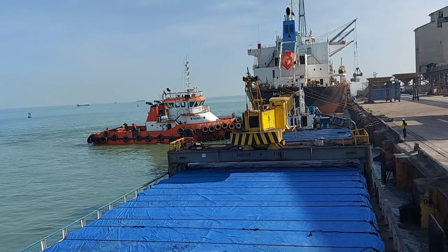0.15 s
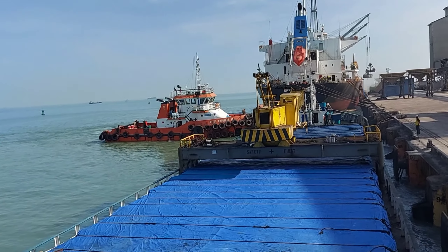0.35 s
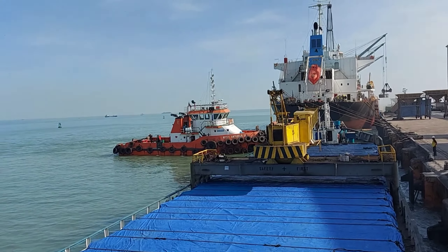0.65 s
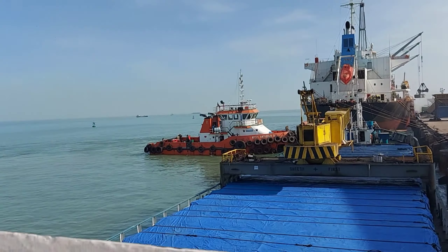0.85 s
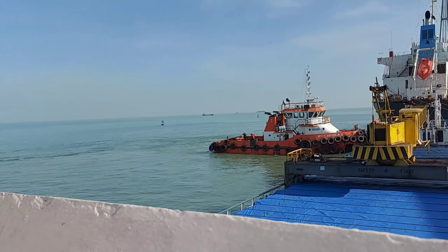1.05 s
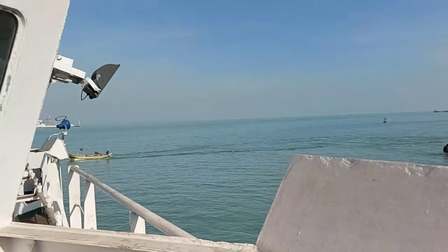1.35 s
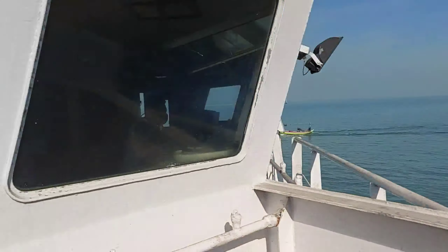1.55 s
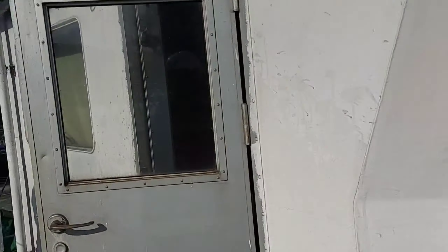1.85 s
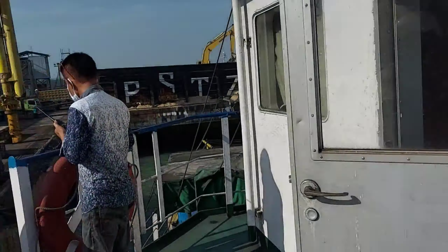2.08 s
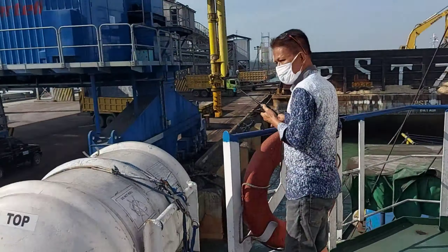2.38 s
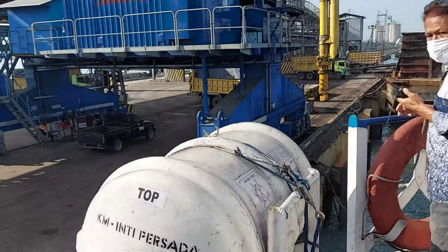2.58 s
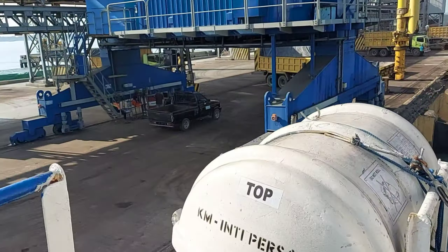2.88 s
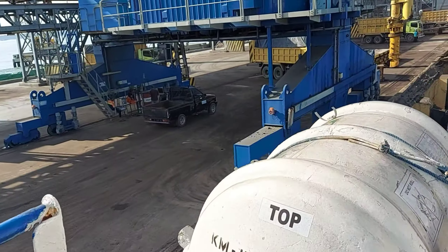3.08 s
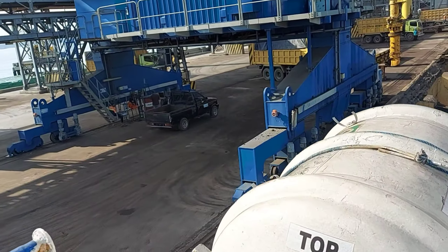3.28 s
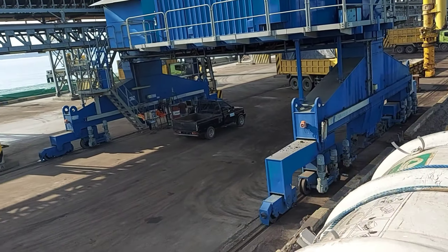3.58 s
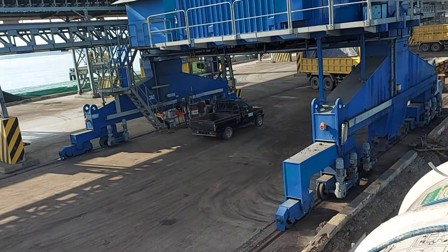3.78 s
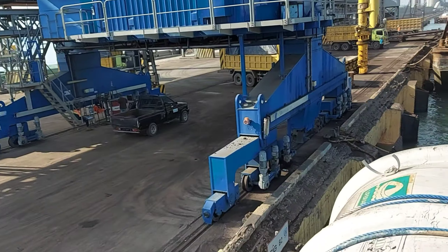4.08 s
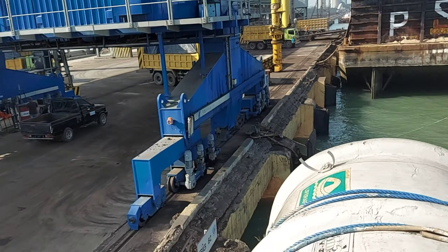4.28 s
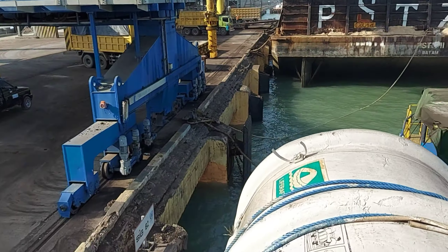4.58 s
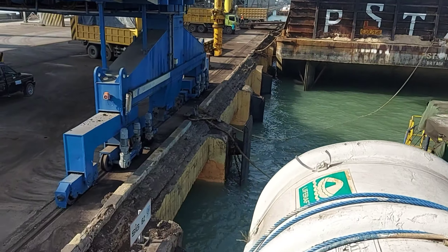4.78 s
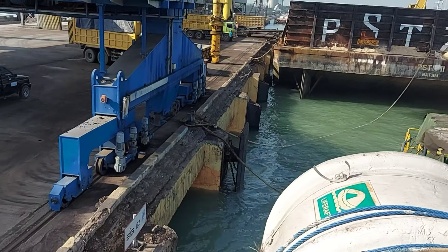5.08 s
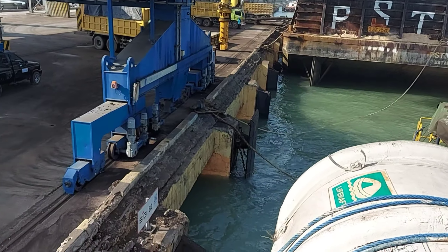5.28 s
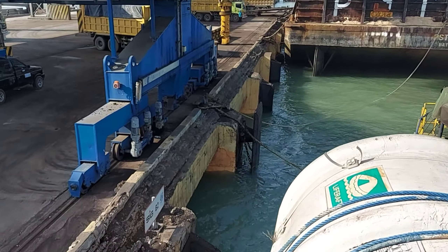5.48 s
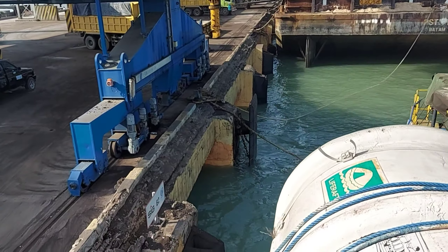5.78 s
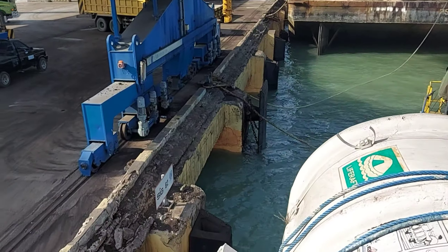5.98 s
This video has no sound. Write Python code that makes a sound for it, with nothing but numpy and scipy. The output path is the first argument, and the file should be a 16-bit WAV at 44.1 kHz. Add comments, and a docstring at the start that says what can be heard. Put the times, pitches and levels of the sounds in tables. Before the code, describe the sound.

A continuous low diesel drone, roughly 55 to 190 hertz, fills the deck, wavering slightly, with a broad, dull roar of machinery and fans all round. From the start a one-cylinder boat engine knocks at about twelve puffs a second, dry, clacking and hissy, on the left. Tiny bird-like chirps flick by at 0.2, 0.6 and 1.35 s; soft low bumps cluster around 1.0 s. From 1.2 to 1.8 s the handheld stereo microphone swings round: the knocks cross to the right, dull and die by 2.05 s. Scuffs and small ticks follow at 2.1-2.6 s, with faint reflected knocks around 2.9-3.1 s. A second engine's very low note glides down, then slowly up. A hollow hum softens, a patchy watery wash grows after 3.3 s, and a duct-like howl near 320 hertz enters around 4 s. Slight ticks, dull swells, faint chirps and a thin whistle close at 6.1 s.

```python
"""The main diesel of a ship drones in sines at multiples and fractions of the shaft rate, beside a jetty.
A second engine hunts in speed as one gliding tone; banded noise makes the roar of machinery and fans all round.
A one-cylinder boat engine knocks across the water: noise puffs ringing through resonances. The two-port
microphone is swung round, so the boat moves from left to right and fades behind the wheelhouse.
Narrow hums, a howl, a whistle, dull swells, a patchy wash, small ticks and gliding chirps fill the rest."""
import sys
import numpy as np
from scipy import signal
from scipy.fft import rfft, irfft, next_fast_len
from scipy.io import wavfile

SR = 44100
rng = np.random.default_rng(int(sys.argv[2]) if len(sys.argv) > 2 else 0)


def master_out(mix):
    """Clip the mix to full scale and print it as 16-bit PCM to the path in sys.argv[1]."""
    frames = np.transpose(np.atleast_2d(mix))
    ceiling = np.clip(frames, -1, 1)
    pcm = np.round(ceiling * 32767).astype(np.int16)
    wavfile.write(sys.argv[1], SR, pcm)


N = 270774
T = np.arange(N) / SR   # time [s]
SWING_MIDDLE_S, SWING_S, SWING_REACH = 1.52, 0.26, 1.06   # the turn that carries the boat from left to right
PORT_LAG_MS = 0.464   # delay to the far port for a sound from the side


def amp(db):
    """Decibels to linear gain."""
    return 10 ** (np.asarray(db) / 20)


def rms_one(x):
    """Scale to an rms of 1."""
    return x / np.sqrt(np.mean(x ** 2) + 1e-20)


def in_time(rows):
    """Columns of a time table joined by straight lines, one value a sample."""
    s, *columns = np.transpose(rows)
    return [np.interp(T, s, c) for c in columns]


def at_hz(points, hz):
    """All columns of a spectrum table at the given frequency, joined along log frequency."""
    f, *columns = np.transpose(points)
    return [np.interp(np.log(hz), np.log(f), c) for c in columns]


def drift(rate_hz):
    """Slow chance with spread 1: low-passed noise made at every 40th sample, then joined by lines."""
    r = np.exp(-80 * np.pi * rate_hz / SR)
    noise = rng.standard_normal(N // 40 + 2002)
    slow = signal.lfilter([1], [1, -2 * r, r * r], noise)[2000:]   # skip the filter's start
    return np.interp(np.arange(N) / 40, np.arange(len(slow)), rms_one(slow - slow.mean()))


def resonance(x, hz, width_hz):
    """Two-pole peak with gain about 1 on top."""
    r = np.exp(-np.pi * width_hz / SR)
    poles = [1, -2 * r * np.cos(2 * np.pi * hz / SR), r * r]
    return signal.lfilter([(1 - r * r) / 2, 0, (r * r - 1) / 2], poles, x)


def tone(hz, level_db):
    """A sine of given rms level on a pitch curve, starting at a random phase."""
    cycles = np.cumsum(hz + 0 * T) / SR + rng.random()
    return np.sqrt(2) * amp(level_db) * np.sin(2 * np.pi * cycles)


def main_engine():
    """Orders with level curves, and wavering minor orders that change as the microphone turns."""
    shaft_hz = 9.42
    # three firing orders and two weaker ones among them, as multiples of the shaft rate [orders]
    traced_orders = [6, 12, 14.1, 18, 20.11]
    # wavering levels of these orders: (time [s], level of each order [dB] in five columns)
    order_levels = [(0, -19.5, -46, -32, -27, -29.5), (.45, -21.5, -42, -30.5, -36.5, -34.5),
                    (.9, -20.5, -46, -35, -34, -35), (1.3, -23, -38, -35, -30.5, -39),
                    (1.65, -19.5, -34.5, -37, -34.5, -40), (2.3, -21.5, -28.5, -48, -33.5, -46),
                    (2.95, -25, -25.5, -46, -30.5, -35), (3.4, -33, -24, -48, -32, -50),
                    (3.8, -44, -27.5, -48, -29, -46), (4.35, -34, -28.5, -40, -28, -43),
                    (4.85, -27, -28.5, -40, -30.5, -51), (5.1, -40, -30.5, -46, -46, -43),
                    (5.55, -36, -28, -33, -31, -48), (5.85, -40, -28, -44, -35, -48),
                    (6.14, -46, -50, -44, -44, -44)]
    # minor orders left by uneven cylinders: (order, level facing the bow [dB], level after the turn [dB])
    minor_orders = [(7.54, -35, -33), (9.06, -45, -39.5), (11.07, -43, -37), (14.98, -43, -67),
                    (15.76, -48, -56), (17.18, -42.5, -50), (19.25, -34.5, -49), (21.94, -52, -45),
                    (24.06, -49, -46.5)]
    out = np.zeros(N)
    for order, level_db in zip(traced_orders, in_time(order_levels)):
        out += tone(order * shaft_hz, level_db)
    turned = (1 + np.tanh((T - SWING_MIDDLE_S) / SWING_S)) / 2   # 0 before the turn, 1 after
    for order, bow_db, turned_db in minor_orders:
        level_db = bow_db + (turned_db - bow_db) * turned
        out += tone(order * shaft_hz, level_db + 3.56 * drift(0.85))
    return out


def second_engine():
    """One gliding firing note that comes in as the microphone clears the wheelhouse."""
    # hunting speed: (time [s], firing note [Hz], level [dB])
    hunting = [(2.05, 43.86, -46), (2.2, 43.7, -29), (2.4, 46, -29), (2.65, 41.7, -24.5), (2.95, 36.9, -36),
               (3.2, 39.94, -31), (3.6, 41.4, -24.5), (4.5, 41.5, -22.5), (5, 42.2, -24), (5.3, 44.1, -31),
               (5.45, 45.7, -24), (5.75, 45.3, -31), (5.9, 48.2, -22), (6.13, 51, -43)]
    return tone(*in_time(hunting)) * np.clip(T - 1, 0, 1)


def roar(patchy_db, lumpy_db):
    """Third-octave noise bands arriving from ahead, from either side and from all round."""
    # centres of rumble, body, middle, edge and treble [Hz]
    centres_hz = [130, 350, 750, 3000, 11000]
    # overall spectrum: (frequency [Hz], relative density [dB per Hz])
    colour = [(26, -14), (60, -7.5), (113, -4.5), (182, -8), (225, -13.5), (301, -5), (560, -19.5),
              (681, -20.5), (1430, -33.5), (2230, -32.5), (3410, -37), (4500, -38.5), (8350, -46.5),
              (11800, -46), (15500, -53.5)]
    # directions against the diffuse part: (frequency [Hz], ahead [dB], left [dB], right [dB])
    arrivals = [(35, 32, -3, 18), (70, 4, -12, -4), (199, 8, 7.5, 6), (438, 8, 7, 3.5), (860, -13, -8, -3),
                (1800, -29, -3, -10), (4150, -13, -8, -8.5), (12000, -30, -47, -37)]
    # level curves whose changes move the five regions: (time [s], level [dB])
    rumble = [(0, 6.5), (.5, 1.5), (1.0, 4.5), (1.6, -3.5), (2.3, 0.5), (3.0, 1), (4, 1), (5.1, -3),
              (5.5, 3), (5.8, 4), (6.14, 7)]
    body = [(0, 1), (.8, 1.5), (1.6, 3.5), (2.6, 3.5), (3.6, 3.5), (4.5, 4), (5.3, 5.5), (6.14, 5.5)]
    middle = [(0.05, -39.5), (0.95, -40.5), (1.25, -42.5), (1.8, -43.5), (2.2, -42.5), (2.8, -41),
              (3.5, -43), (4.43, -43), (5.22, -42), (5.61, -39), (6.1, -38)]
    edge = [(0.05, -49), (0.5, -44.5), (1.0, -47.5), (1.4, -49.5), (2.3, -49.5), (3.0, -48.5), (3.7, -49),
            (4.5, -48.5), (5.3, -48), (5.7, -47.5), (6.1, -45)]
    treble = [(0.05, -55.5), (0.5, -49.5), (0.96, -51.5), (1.46, -56.5), (2.36, -54.5), (2.58, -55.5),
              (4.82, -53.5), (5.27, -54.5), (6.1, -50.5)]
    curves = [in_time(rows)[0] for rows in (rumble, body, middle, edge, treble)]
    levels = np.array(curves)[:, ::64]
    steady = levels[:, levels.shape[1] // 2:].mean(axis=1)   # swells are relative to the second half
    moves = levels - steady[:, None]

    lag = round(PORT_LAG_MS * SR / 1000)
    edges_hz = 26 * 2 ** (np.arange(29) / 3)
    white = rng.standard_normal((2, 5, N))   # neighbouring bands take turns with two sets of noise
    together, out = drift(2.1), 0
    for k, (low, high) in enumerate(zip(edges_hz, edges_hz[1:])):
        hz = np.sqrt(low * high)
        ahead, left, right, own_l, own_r = white[k % 2]
        a, l, r = amp(at_hz(arrivals, hz))
        # a sound from the side reaches the far port late
        port_l = a * ahead + l * left + r * np.roll(right, lag) + own_l
        port_r = a * ahead + l * np.roll(left, lag) + r * right + own_r
        pair = np.array([port_l, port_r]) / np.sqrt(a * a + l * l + r * r + 1)

        # blend the two nearest level curves
        place = np.interp(np.log(hz), np.log(centres_hz), np.arange(len(levels)))
        i = min(int(place), len(levels) - 2)
        swell = (i + 1 - place) * moves[i] + (place - i) * moves[i + 1]
        patches = 0.2 * together + drift(18.0) + 0.55 * drift(2.3)
        lumps = (hz < 200) * drift(4.5)   # the rumble comes in slow lumps
        gain_db = at_hz(colour, hz)[0] + np.interp(T, T[::64], swell)
        gain_db = gain_db + patchy_db * patches + lumpy_db * lumps
        band = signal.butter(2, [low, high], "band", fs=SR, output="sos")
        out = out + amp(gain_db) * signal.sosfilt(band, pair)
    return rms_one(out)


def puff(length, rise_s, fall_s):
    """A gas puff: noise under an envelope that swells fast to 1 and dies; length in samples."""
    t = np.arange(length) / SR
    shape = (1 - np.exp(-(t / rise_s) ** 2)) * np.exp(-t / fall_s)
    return shape / shape.max() * rng.standard_normal(length)


def even_start(x):
    """Scale so that the first 10 ms have spread 1."""
    return x / x[:SR // 100].std()


def boat_bearing():
    """Direction of the boat: -1 left, 1 right, with a slight overshoot of both."""
    return SWING_REACH * np.tanh((T - SWING_MIDDLE_S) / SWING_S)


def exhaust_blow(size, blow, scatter, echo_db, crack_db):
    """A puff, its scatter off hulls, and a one-sample crack in the blow; puffs are (rise [s], fall [s])."""
    crack_s = .0045
    gas = puff(size, *blow) + amp(echo_db) * puff(size, *scatter)
    gas[round(crack_s * SR)] += amp(crack_db)
    return gas


def knock_mid(gas, peak_hz):
    """The moving mid peak of the knock, coloured by the delay between the ports, and two fixed resonances."""
    ring = resonance(gas, peak_hz, 340) - 0.52 * resonance(gas, 1150, 300) + 0.25 * resonance(gas, 1950, 180)
    return resonance(ring, peak_hz, 3600)   # little passes far from the peak


def knock_clack(gas, clack_hz, early):
    """Bright resonances struck with other strengths by each blow."""
    scatter_db = 4.5
    # (centre [Hz], width [Hz], level early in the turn and before [dB], level later [dB])
    clack_peaks = [(2500, 1500, -11, -7), (2780, 230, -4, -12), (3650, 270, 5, 0), (3850, 310, -2, -7),
                   (4800, 240, -4, -9), (5500, 270, -8, -11), (4800, 2300, -16, -16)]
    out = resonance(gas, clack_hz, 400)
    for hz, width_hz, early_db, later_db in clack_peaks:
        level_db = (early_db if early else later_db) + scatter_db * rng.standard_normal()
        out = out + amp(level_db) * resonance(gas, hz, width_hz)
    return resonance(out, clack_hz, 5100)


def knock_spit(gas):
    """The hissing top of the blow, from wide high resonances."""
    # (centre [Hz], width [Hz], level [dB])
    spit_peaks = [(6300, 1500, -3), (7460, 1000, 13.5), (9630, 3200, 7), (11500, 2000, -1),
                  (14000, 3500, -5)]
    return sum(amp(db) * resonance(gas, hz, width_hz) for hz, width_hz, db in spit_peaks)


def valve_tick(size, knock_s, lead_s):
    """A short ringing tick, then a brighter seating click, lost behind the wheelhouse."""
    valve_hz, valve_width_hz, valve_db, scatter_db = 2580, 120, -47, 2.5
    seat_hz, seat_width_hz, seat_db, seat_lead_s = 3900, 1300, -4, .0135   # level against the tick
    fade_from_s, fade_db_per_s = 1.55, 33
    tick = resonance(puff(size, 0.001, 0.0033), valve_hz, valve_width_hz)
    tick = even_start(resonance(tick, valve_hz, 400))
    seat = even_start(resonance(puff(size, 0.00048, 0.001), seat_hz, seat_width_hz))
    seat = np.roll(amp(seat_db) * seat, round((lead_s - seat_lead_s) * SR))
    level_db = valve_db + scatter_db * rng.standard_normal() - fade_db_per_s * max(knock_s - fade_from_s, 0)
    return amp(level_db) * (tick + seat)


def boat(echo_db, shadows_db):
    """A valve ticks, then each firing blows a puff of gas; the far port hears it later and duller."""
    # exhaust knocks: (time [s], mid level [dB], mid peak [Hz], clack level [dB], clack centre [Hz],
    # spit level [dB]), levels over the first 10 ms
    knocks = [(0.0615, -33.5, 1790, -39, 5000, -43), (0.1438, -33, 1560, -35, 2800, -43),
              (0.2258, -28.5, 1600, -35.5, 3300, -42), (0.308, -31.5, 1370, -37.5, 3700, -42),
              (0.3879, -34, 1720, -37, 4870, -40), (0.471, -36, 1490, -35, 3600, -44),
              (0.553, -32.5, 1860, -35, 4020, -39), (0.6338, -30, 1780, -35, 4020, -54),
              (0.7164, -28.5, 1620, -41, 3900, -52), (0.798, -29, 1850, -46, 3200, -51),
              (0.881, -33, 1820, -39, 3600, -50), (0.962, -33.5, 1860, -35, 4700, -44),
              (1.043, -30, 2050, -37, 4600, -43), (1.1247, -33.5, 2270, -40, 3100, -39),
              (1.208, -33, 2370, -40, 2950, -45), (1.2898, -34, 2400, -38, 3130, -43),
              (1.3734, -40, 2800, -34, 4930, -42), (1.454, -37, 1900, -37, 4000, -41.5),
              (1.5353, -36, 2030, -34.5, 4300, -42), (1.617, -36.5, 1800, -42.5, 4170, -43),
              (1.699, -43, 1700, -41, 4600, -43), (1.78, -45, 1800, -46, 4800, -43.5),
              (1.863, -42, 2110, -44, 3300, -48), (1.946, -42, 1800, -47, 3800, -49),
              (2.028, -46, 1600, -59, 4400, -57)]
    crack_db, rebound_s, rebound_db = 11, .0145, -13
    valve_lead_s, clack_change_s = .0185, 1.33
    size = 3000
    parts = np.zeros((3, N))   # mid with valve, clack, spit
    for s, mid_db, mid_hz, clack_db, clack_hz, spit_db in knocks:
        dull_gas = exhaust_blow(size, (0.0025, 0.005), (0.0071, 0.019), echo_db, crack_db + 8)
        # the bright part has a puff of its own, with a small rebound after it
        bright_gas = exhaust_blow(size, (0.0034, 0.0049), (0.012, 0.015), echo_db, crack_db)
        bright_gas += amp(rebound_db) * np.roll(bright_gas, round(rebound_s * SR))
        mid = knock_mid(dull_gas, mid_hz)
        clack = knock_clack(bright_gas, clack_hz, s < clack_change_s)
        spit = knock_spit(bright_gas)
        at = round((s - .002) * SR)
        for k, (part, level_db) in enumerate(((mid, mid_db), (clack, clack_db), (spit, spit_db))):
            parts[k, at:at + size] += amp(level_db) * even_start(part)
        at -= round(valve_lead_s * SR)
        parts[0, at:at + size] += valve_tick(size, s, valve_lead_s)

    bearing = boat_bearing()
    shadow_db = np.outer(shadows_db, bearing)   # the microphone body shades the treble most
    ports = []
    for side in (1, -1):   # left, right
        shaded = np.sum(parts * amp(-side * shadow_db), axis=0)
        ports.append(np.interp(T - side * bearing * PORT_LAG_MS / 2000, T, shaded))
    return np.array(ports)


def hum(hz, waver_hz, level_db):
    """Noise in a very narrow resonance: two tones whose sizes wander through zero."""
    first = tone(hz, level_db) * drift(waver_hz)
    second = tone(hz, level_db) * drift(waver_hz)
    return (first + second) / np.sqrt(2)


def door_hum():
    """A wavering hum that is loudest beside the wheelhouse door."""
    hum_hz, base_db = 394, -49
    door_s, span_s, rise_db = 2.35, 2.2, 10.5
    near = np.exp(-((T - door_s) / span_s) ** 2)
    return tone(hum_hz + 1.75 * drift(3.05), base_db + rise_db * near + drift(2.3))


def duct_howl():
    """A duct howl that rises near the rail: one tone unsteady in pitch and level."""
    # (time [s], pitch [Hz], level [dB])
    howl_curve = [(3.7, 316, -55), (4.1, 318, -36), (4.6, 318, -36), (4.8, 316, -37), (5.05, 320, -31),
                  (5.3, 330, -36), (5.6, 335, -39), (5.95, 343, -34), (6.14, 345, -42)]
    hz, level_db = in_time(howl_curve)
    return tone(hz + 2.72 * drift(3.3), level_db + 1.7 * drift(3.6))


def whistle():
    """A faint fluttering high tone near the end."""
    # (time [s], pitch [Hz], level [dB])
    whistle_curve = [(5.8, 5400, -80), (5.86, 5400, -60), (5.92, 5400, -61), (5.96, 5400, -68),
                     (6.02, 5410, -56), (6.12, 5420, -56), (6.14, 5420, -66)]
    hz, level_db = in_time(whistle_curve)
    return tone(hz + 15 * drift(20), level_db + 2.0 * drift(16))


def whines():
    """Narrow noisy whines that come and go under flat-topped swells."""
    # (middle [s], half length [s], pitch [Hz], waver [Hz], level [dB])
    whine_rows = [(1.68, .17, 970, 130, -56), (5.53, .2, 2060, 18, -57), (3.3, .5, 11700, 60, -72),
                  (4.9, .5, 11700, 60, -71), (4.1, .25, 9900, 80, -72)]
    out = np.zeros(N)
    for middle_s, half_s, hz, waver_hz, level_db in whine_rows:
        out += hum(hz, waver_hz, level_db) * np.exp(-((T - middle_s) / half_s) ** 4)
    return out


def hums():
    """Narrow hums of plating and ducts, with the howl, whines and whistle."""
    # (pitch [Hz], waver [Hz], level [dB])
    hum_rows = [(262, 2.5, -42), (300, 6, -42), (557, 1.5, -56)]
    plating = sum(hum(*row) for row in hum_rows)
    return plating + door_hum() + whines() + duct_howl() + whistle()


def thuds():
    """Dull swells in the rumble: each is a low note under a smooth rise and fall."""
    # (start [s], peak level [dB], pitch [Hz], time to the peak [s])
    thud_rows = [(0.9615, -12, 134, 0.006), (0.9815, -9, 134, 0.006), (1.0005, -10, 125, 0.005),
                 (1.131, -16, 111, .005), (2.33, -20.5, 175, 0.015), (5.38, -22, 70, 0.072),
                 (5.78, -16, 116.5, 0.05)]
    out = np.zeros(N)
    for s, peak_db, hz, length_s in thud_rows:
        age = np.clip(T - s, 0, None) / length_s
        out += amp(peak_db) * age * np.exp(1 - age) * np.sin(2 * np.pi * hz * (T - s))
    return out


def ticks():
    """Small ticks and scuffs as puffs of uneven grains, unrelated in the two ports."""
    # four at the knocking period (2.883, 2.962, 3.05 and 3.129 s) are the boat's knocks, reflected:
    # (start [s], peak level [dB], centre [Hz], width [Hz], left minus right [dB], fall time [s])
    tick_rows = [(2.106, -31, 3280, 2200, 0, 0.022), (2.124, -29, 1740, 1200, -3, 0.069),
                 (2.193, -38, 3500, 3000, -2, 0.008), (2.256, -31, 2000, 1300, -1, 0.028),
                 (2.4, -42, 6500, 300, -2, 0.008), (2.5452, -29, 12500, 6000, 3, 0.0005),
                 (2.548, -29, 11500, 4000, 3, 0.00099), (2.552, -34, 11500, 5000, 3, 0.0015),
                 (2.556, -29, 11000, 9000, 2, 0.00084), (2.355, -33, 1900, 400, -2, 0.004),
                 (2.883, -32, 4600, 2500, -2, 0.016), (2.962, -37, 4800, 2200, -4.5, 0.014),
                 (3.05, -36, 4720, 1600, -7, 0.022), (3.129, -36, 5500, 2500, -2, 0.012),
                 (2.891, -42, 10500, 2500, 0, 0.01), (5.257, -35.5, 2730, 300, 0, 0.018),
                 (5.364, -35, 4140, 496, 4, 0.01), (5.662, -34, 8000, 2990, 0, 0.0072)]
    out, size = np.zeros((2, N)), 15000
    for s, peak_db, hz, width_hz, pan_db, fall_s in tick_rows:
        grains = [puff(size, min(0.0067, fall_s), fall_s) * amp(2.7 * rng.standard_normal(size))
                  for port in range(2)]
        burst = resonance(np.array(grains), hz, width_hz)
        burst = resonance(burst, hz, 2 * width_hz)
        port_db = peak_db + np.array([[pan_db / 2], [-pan_db / 2]])
        at = round(s * SR)
        out[:, at:at + size] += amp(port_db) * burst / np.abs(burst).max()
    return out


def patchy_wash():
    """Patchy grains of narrow ringing noise in the wash, unrelated in the two ports."""
    median_per_s, ring_cycles = 90, 16   # grains in each port; pitch over resonance width
    from_s, start_db, rise_db_per_s = 3.3, -58.5, 1.5   # under a one-second fade-in
    out, pitches_hz = np.zeros((2, N)), np.geomspace(650, 3000, num=14)
    born = rng.random((2, N)) < median_per_s * amp(5 * drift(3)) / SR
    sizes = born * amp(3.1 * np.minimum(rng.exponential(1, (2, N)), 4))
    dealt = rng.integers(0, len(pitches_hz), (2, N))   # which pitch each grain gets
    for k, hz in enumerate(pitches_hz):
        out += resonance(sizes * (dealt == k) + 1e-18, hz, hz / ring_cycles) / np.sqrt(hz)
    rise = amp(start_db + rise_db_per_s * (T - from_s))
    return rms_one(out) * rise * np.clip(T - from_s, 0, 1)


def chirps():
    """Short chirps, likely birds: each is a gliding sine under a smooth arch, louder on the right."""
    # (start [s], length [s], start pitch [Hz], end pitch [Hz], level before the arch and panning [dB])
    chirp_rows = [(.186, .016, 5300, 3500, -53), (.258, .02, 5600, 3900, -48), (.57, .04, 5400, 6200, -58),
                  (1.352, .018, 5500, 4400, -50), (5.8, .06, 3100, 3200, -56), (6.0, .09, 3050, 3150, -53)]
    out = np.zeros(N)
    for s, length_s, start_hz, end_hz, level_db in chirp_rows:
        part = np.clip((T - s) / length_s, 0, 1)
        arch = np.sqrt(np.sin(np.pi * part).clip(0))
        out += arch * tone(start_hz + (end_hz - start_hz) * part, level_db)
    return out * amp([[-3], [2]])   # left, right


def scene():
    """Engines ahead, roar all round, boat on the move."""
    ahead = main_engine() + second_engine() + hums() + thuds()   # equal in both ports
    around = amp(-24.0) * roar(patchy_db=1.08, lumpy_db=0.24)
    across = boat(echo_db=-17.0, shadows_db=[.9, 2.5, 3.5])
    return ahead + around + across + ticks() + patchy_wash() + chirps()


def record(dry):
    """The two ports differ in colour; the deepest bass and the top are cut."""
    # (frequency [Hz], left minus right [dB])
    port_balance = [(60, 0.5), (400, 1), (800, 0.5), (1450, 1), (2000, -0.5), (2900, -1), (4100, -5),
                    (5900, -6), (7500, -7), (8400, -2), (9300, 1), (11000, 0), (15000, -3)]
    # colour that both ports share: (frequency [Hz], gain [dB])
    port_colour = [(330, 0), (400, -2), (480, 2), (590, 0), (650, -2), (800, -1.5), (1000, 1), (1300, 1),
                   (2400, -2), (2900, 0.5), (3300, -1), (7000, -2.5), (8400, -3), (9200, 1), (11500, -0.5),
                   (15200, -3.5)]
    size = next_fast_len(N + 4096)
    hz = np.arange(size // 2 + 1) * SR / size + 1   # 1 Hz up, to keep the logarithm finite
    tilt_db = at_hz(port_balance, hz)[0] / 2
    colour_db = at_hz(port_colour, hz)[0]
    gains = amp([colour_db + tilt_db, colour_db - tilt_db])
    ports = irfft(rfft(dry, size) * gains, size)[:, :N]
    bass_cut = signal.butter(5, 34, "high", fs=SR, output="sos")
    top_cut = signal.ellip(12, .5, 80, 15500, fs=SR, output="sos")
    return signal.sosfilt(top_cut, signal.sosfilt(bass_cut, ports))


dry = scene()
out = record(dry)
master_out(out)
```